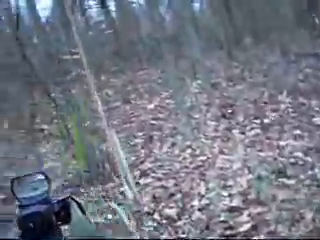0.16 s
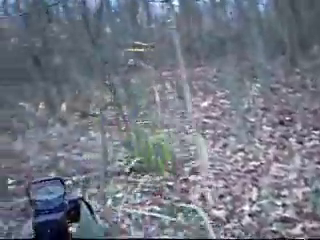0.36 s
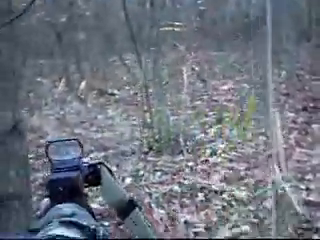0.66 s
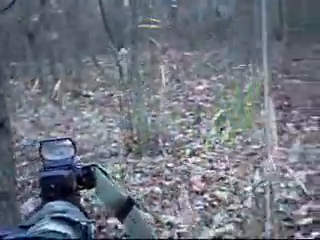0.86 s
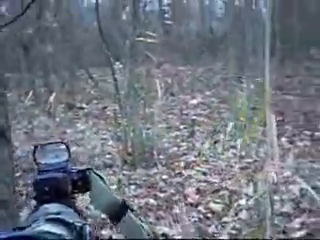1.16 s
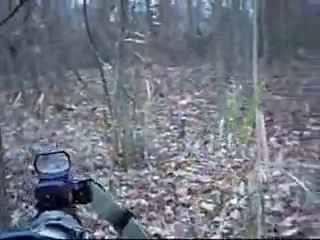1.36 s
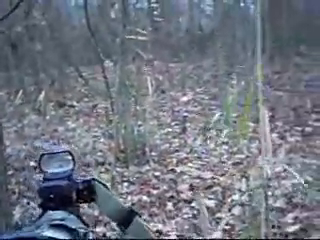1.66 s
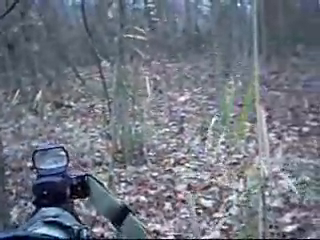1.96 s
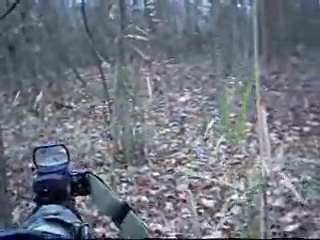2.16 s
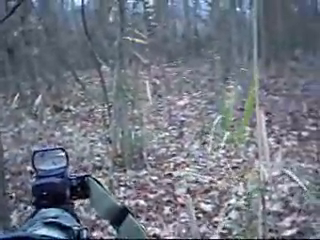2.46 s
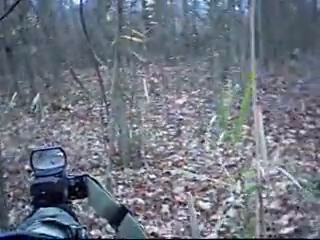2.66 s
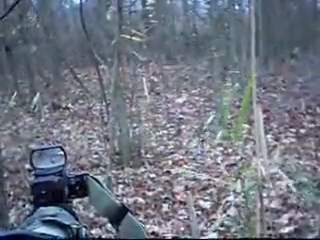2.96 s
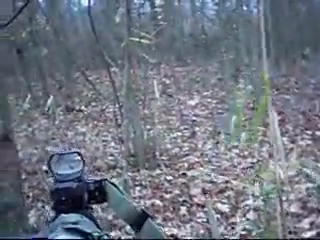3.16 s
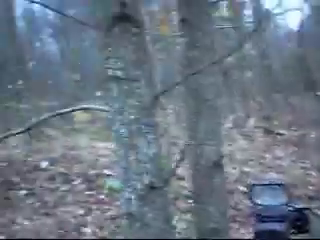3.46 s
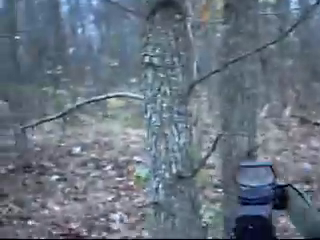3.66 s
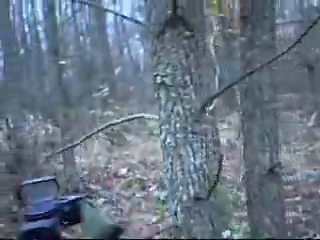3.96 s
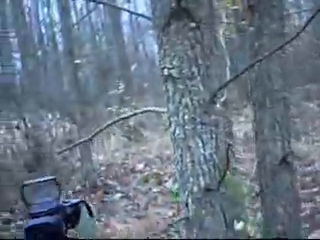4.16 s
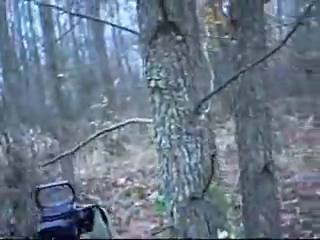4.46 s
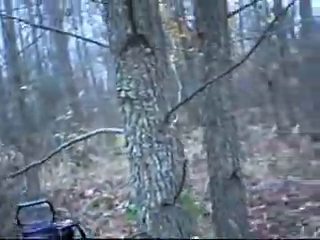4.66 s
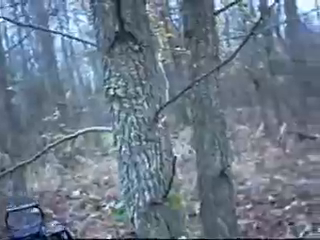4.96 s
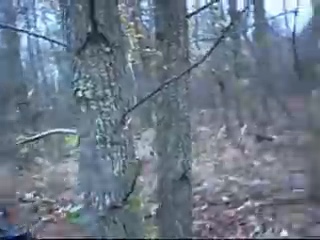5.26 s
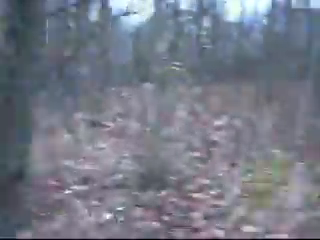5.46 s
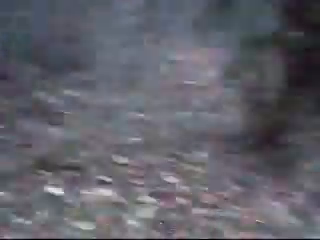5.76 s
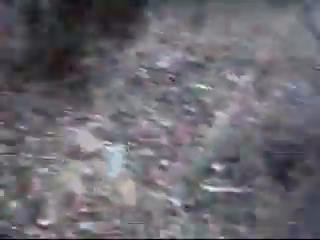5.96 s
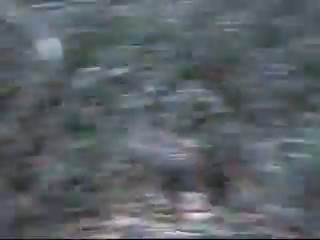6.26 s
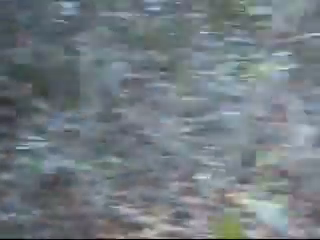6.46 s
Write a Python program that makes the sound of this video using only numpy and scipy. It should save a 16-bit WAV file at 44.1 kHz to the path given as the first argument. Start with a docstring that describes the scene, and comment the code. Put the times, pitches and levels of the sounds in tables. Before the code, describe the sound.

An electric airsoft rifle fires two rapid bursts up close, motor whining and piston clacking, with dry leaves rustling in the woods.

```python
"""Woods, on the microphone of a small handheld camera. First dry leaves rustle, with sharp dry ticks over
them, and the moving camera rumbles and bumps. At 0.8 s an electric airsoft rifle starts up right beside
it and fires a long burst, twelve shots a second: the geared motor whines and sags against the spring,
the piston clacks, the barrel pops, and the microphone overloads. A shorter burst follows at 4.1 s; in
both the level drops in steps. The motor coasts to rest, and the rustle and ticks grow to the end."""
import sys
import numpy as np
from scipy import signal
from scipy.fft import rfft, irfft
from scipy.io import wavfile

SR = 44100
rng = np.random.default_rng(int(sys.argv[2]) if len(sys.argv) > 2 else 0)


def unload_audio(sound):
    """Save the sound as a 16-bit wav file, at the path given as the first command line argument."""
    columns = np.transpose(np.atleast_2d(sound))
    # keep every value between -1 and 1, then stretch to whole-number steps
    steps = np.round(np.clip(columns, -1, 1) * 32767)
    wavfile.write(sys.argv[1], SR, steps.astype(np.int16))


N = 291051
TIME = np.arange(N) / SR

# Levels in the tables are relative.
# rustling leaves, one list each before, between and after the bursts: t/s, level/dB
LEAF_STIR = [
    [(0.0, -50), (0.332, -50.5), (0.76, -43.5)],
    [(3.3, -51.5), (3.452, -56), (3.718, -50.5), (3.97, -44), (4.11, -43)],
    [(5.53, -48.5), (6.094, -46), (6.242, -39.5), (6.368, -38.5), (6.6, -33.5)],
]
# spectrum of dry leaves: f/Hz, level/dB
LEAF_SPECTRUM = [(100, -10), (500, -5), (1200, -5), (2200, -6.5), (3200, -5), (4600, -3.5), (6200, -9),
                 (8000, -15), (10000, -22), (12400, -30)]
# camera moves that push air over the microphone: middle t/s, half length/s, level/dB
CAMERA_SWINGS = [(0.418, 0.28, -21.5), (0.851, 0.035, -17.5), (2.15, 1.2, -32), (4.743, 0.78, -30),
                 (5.969, .2, -19)]
# spectrum of that air: f/Hz, level/dB
RUMBLE_SPECTRUM = [(8, -11), (25, 2.5), (45, -3), (90, -7), (160, -18.5), (300, -29.5), (600, -45),
                   (1500, -73), (4000, -88)]
# soft bumps of the camera in the hand: t/s, signed height, rise/s
CAMERA_BUMPS = [(.12, 0.12, 0.0034), (0.308, -.27, 0.0029), (0.3607, -0.58, 0.0012), (.409, -0.16, 0.0011),
                (.455, -0.12, 0.0011), (.567, -0.094, .001), (.648, 0.16, 0.0019), (.688, 0.29, 0.0018),
                (.76, 0.25, 0.0022), (3.399, 0.056, .002), (3.557, 0.094, 0.0028), (3.715, 0.11, 0.0032),
                (3.834, 0.12, 0.0026), (3.996, 0.13, 0.0026), (4.118, 0.16, 0.0034), (5.652, .08, 0.0021),
                (6.318, 0.21, 0.0022), (6.552, 0.21, 0.0023)]
# something scuffs the camera: t/s, length/s, level/dB
CAMERA_SCUFFS = [(.3605, .005, -38), (6.3625, .0145, -16)]
# spectrum of a scuff: f/Hz, level/dB
SCUFF_SPECTRUM = [(100, 7.5), (500, 5), (1500, -1.5), (3000, -3.5), (5000, 4), (7500, -10.5), (12000, -22)]
# sharp dry ticks, growing louder to the end: t/s, level/dB
DRY_TICKS = [(0.4793, -20.5), (3.3677, -26), (3.6316, -33), (3.71, -34), (3.9419, -22.5), (5.6376, -23),
             (5.7174, -18), (5.7912, -17), (5.8651, -15.5), (6.0561, -13), (6.1444, -14.5), (6.2208, -15),
             (6.2756, -17), (6.2956, -12.5), (6.5041, -9), (6.5854, -6)]
# spectrum of a tick: f/Hz, level/dB
TICK_SPECTRUM = [(300, -1), (1500, -10.5), (3000, -1.5), (4600, 10.5), (6000, -1.5), (8000, -12.5),
                 (12000, -57)]
# bursts of fire: trigger t/s, first shot t/s, number of shots, period/s
FIRING = [(.778, .8812, 29, .08183), (4.125, 4.2176, 15, .08218)]
# recorded level of the shooting, which drops in abrupt steps after loud shots: t/s, level/dB
SHOOTING_LEVEL = [(.78, 13), (.893, 8.5), (0.895, -1), (3.29, -2), (4.125, 13), (4.23, 10), (4.75, 8),
                  (4.83, 4), (5.2, 4), (5.26, 1), (5.38, 0)]
# the spring's load through one cycle: share of the cycle, pinion mesh f/Hz, whine/dB, rattle/dB
SPRING_CYCLE = [(0, 2000, -2, 11), (.13, 2370, -11.5, 3), (.22, 2420, -8, -2), (.28, 2455, -6.5, 4.5),
                (.5, 2360, -2.5, 0), (.7, 2200, -3, 3), (.86, 1989, -3.5, 1), (.92, 1827, -14, -9.5),
                (1, 1998, -5.5, 9.5)]
# tones of the gear train: multiple of the pinion mesh, level/dB
GEAR_TONES = [(1 / 3, -24.5), (1, -19.5), (2, -21.5), (3, -36)]
# housing resonances that swell a gear tone sweeping over them: f/Hz, level/dB
HOUSING_RESPONSE = [(250, -53), (550, -15.5), (720, -4), (785, -3.5), (900, 4.5), (1250, -4), (1570, -1.5),
                    (1950, -7.5), (2200, -2), (2370, 2), (2600, -6.5), (3150, -4), (3900, -6.5),
                    (5000, -6.5)]
# spectrum of the gearbox shell: f/Hz, level/dB
SHELL_SPECTRUM = [(100, -28), (400, -9.5), (750, 0.5), (1150, -1.5), (1550, 2.5), (1950, -1), (2450, 3.5),
                  (3200, -1.5), (4200, 2), (4950, 2.5), (5300, 6), (5650, 3.5), (6300, 2.5), (7500, -14.5),
                  (10000, -23), (12500, -33)]
# small metal parts click in the gearbox: t/s, level/dB
LATCH_CLICKS = [(0.874, -6), (3.227, -10), (4.208, -4), (4.242, 9), (5.433, -13), (5.489, -12.5),
                (5.493, -11), (5.508, -20)]
# modes of those parts, of the last tooth letting go and of the first catching: f/Hz, level/dB, t60/s
LATCH_MODES = [(1210, -11, .019), (2160, -25, .055)]
SLIP_MODES = [(1746, 0, .012), (2170, 1, .0074)]
CATCH_MODES = [(1476, .016, .031)]
# modes of the piston's clack: f/Hz, level/dB, t60/s
PISTON_MODES = [(1420, -32, 0.0037), (2900, -6.5, 0.0042), (3936, -6.5, 0.0065), (4760, -4, 0.005),
                (6770, 7, 0.0023), (9900, -13, 0.0017), (12960, -36, 0.001)]
# the barrel's air column after the pop: f/Hz, level/dB, t60/s
BARREL_MODES = [(675, -8, 0.019), (786, 1.5, 0.011), (1058, -3.5, 0.023), (1164, -17, 0.027)]
# the stock, answering the blow in the opposite sense: f/Hz, level/dB, t60/s
STOCK_MODES = [(296, -17, 0.021)]
# shots whose pop falls together with the clack: t/s
NO_LAG_SHOTS = [3.111, 5.05]
# spectrum of the jolt to the camera: f/Hz, level/dB
RECOIL_SPECTRUM = [(30, -14), (95, -1), (190, -2.5), (300, -10.5), (600, -31), (2000, -57)]
# spectrum of the echo off the trunks: f/Hz, level/dB
ECHO_SPECTRUM = [(200, -21), (1000, 0), (5000, 5.5), (10000, -4.5)]

# where SHOOTING_LEVEL is higher, clack and jolt gain on the motor and the pop falls behind (dB per dB)
CLACK_SLOPE, RECOIL_SLOPE, POP_SLOPE = .63, 2.47, -.57


def amp(db):
    """Decibels to gain."""
    return 10 ** (np.asarray(db) / 20)


def unit(x):
    """Scales to an rms of one."""
    return x / np.sqrt(np.mean(x ** 2) + 1e-20)


def follow(rows, at):
    """Interpolates a table's other columns along its first."""
    first, *columns = np.transpose(rows)
    return [np.interp(at, first, c) for c in columns]


def add(mix, s, sound):
    """Mixes a sound in at time s."""
    part = mix[max(round(s * SR), 0):][:len(sound)]
    part += sound[:len(part)]


def colour(x, spectrum, size=8192):
    """Minimum-phase filter shaped like the spectrum; white noise keeps its level."""
    hz, db = np.transpose(spectrum)
    bin_hz = abs(np.fft.fftfreq(size, 1 / SR)) + 1
    log_gain = np.log(amp(np.interp(np.log(bin_hz), np.log(hz), db)))
    taps = np.fft.ifft(np.exp(np.conj(signal.hilbert(log_gain)))).real[:size // 2]
    return signal.oaconvolve(x, taps / np.linalg.norm(taps))[:len(x)]


def wander(rate_hz):
    """Smooth random drift of rms one, mostly slower than the given rate."""
    lowpass = np.exp(-(np.fft.rfftfreq(N, 1 / SR) / rate_hz) ** 2)
    return unit(irfft(rfft(rng.standard_normal(N)) * lowpass, N))


def ring(modes, t):
    """Dying modes; a machine strikes them almost alike every time."""
    hz, db, t60 = np.transpose(modes)[:, :, None]
    detune, strength = rng.standard_normal((2, len(modes), 1))
    hz, db = hz * (1 + .008 * detune), db + .7 * strength
    return (amp(db) * np.exp(-np.log(1000) * t / t60) * np.sin(2 * np.pi * hz * t)).sum(0)


def puff(t, decay_s):
    """A burst of noise that dies away."""
    return rng.standard_normal(len(t)) * np.exp(-t / decay_s)


def shot_times(burst, tiring_s_per_shot=.000032, slow_start_s=.0091):
    """The gearbox fires once a cycle, at an almost even pace."""
    _, first, count, period = burst
    k = np.arange(count)
    tiring = tiring_s_per_shot * k ** 2 / 2  # the tiring battery lengthens each cycle
    slow_start = slow_start_s * (1 - .15 ** k)  # the motor is still gathering speed
    return first + k * period + tiring + slow_start


def all_shots():
    """Every shot as t/s, shooting level/dB."""
    times = np.concatenate([shot_times(burst) for burst in FIRING])
    return zip(times, follow(SHOOTING_LEVEL, times)[0])


def leaves(level_db=3.5, hiss_db=-1, crackle_db=-5, cracks_per_s=450):
    """Dry leaves rustle: a soft hiss thick with tiny cracks of uneven size."""
    stir_db, = follow(np.concatenate(LEAF_STIR), TIME)
    cracks = (rng.random(N) < cracks_per_s / SR) * rng.standard_normal(N)
    cracks *= amp(4 * np.minimum(rng.exponential(1, N), 4))
    hiss = rng.standard_normal(N) * amp(wander(34))
    rustle = amp(hiss_db) * unit(hiss) + amp(crackle_db) * unit(cracks)
    return amp(level_db + stir_db) * unit(colour(rustle, LEAF_SPECTRUM))


def air_rumble(still_db=-40):
    """Air rumbles on the microphone and swells as the camera moves."""
    swells = sum(amp(db) * np.exp(-abs((TIME - s) / half) ** 3) for s, half, db in CAMERA_SWINGS)
    return (amp(still_db) + swells) * unit(colour(rng.standard_normal(N), RUMBLE_SPECTRUM))


def bumps():
    """Handling reaches the microphone as soft, one-sided pressure pulses."""
    out = np.zeros(N)
    for s, height, rise_s in CAMERA_BUMPS:
        age = TIME[:2500] / rise_s
        add(out, s, height * (age * np.exp(1 - age)) ** 2)
    return out


def scuffs():
    """Brief gritty rubs on the camera's body."""
    contact = sum(amp(db) * (TIME > s) * (TIME < s + length) for s, length, db in CAMERA_SCUFFS)
    grit = unit(rng.standard_normal(N) * amp(2 * wander(700)))
    return colour(contact * grit, SCUFF_SPECTRUM)


def ticks(trim_db=-5, spray_db=-19):
    """Sharp dry ticks over the rustle: each a very short crack with a faint spray after it."""
    out, t = np.zeros(N), TIME[:1500]
    for s, db in DRY_TICKS:
        crack = colour(puff(t, decay_s=.0002) + amp(spray_db) * puff(t, decay_s=.0053), TICK_SPECTRUM)
        add(out, s + .00033, 2 * amp(db + trim_db) * crack / abs(crack).max())
    return out


def gear_whine(mesh_hz, mesh_phase):
    """Meshing teeth sing in fluttering tones that swell on the housing's resonances."""
    flutter_db = 2.2 * wander(130)
    whine = np.zeros(N)
    for multiple, db in GEAR_TONES:
        housing_db, = follow(HOUSING_RESPONSE, multiple * mesh_hz)
        whine += amp(db + flutter_db + housing_db) * np.sin(multiple * mesh_phase)
    return np.sqrt(2) * whine


def gear_rattle(mesh_phase, pinion_teeth=10, knocks_per_s=900, scrape_db=-25, knock_db=-29, shaft_db=-26):
    """Inside the shell each tooth scrapes into mesh, and loose ones knock at random."""
    # uneven teeth and brushes repeat with every turn of the shaft
    orders = range(3, 3 * pinion_teeth)
    shaft = unit(sum(np.cos(k * mesh_phase / pinion_teeth + 2 * np.pi * rng.random()) for k in orders))
    scrape = unit(rng.standard_normal(N) * (1 + .45 * np.cos(mesh_phase)))
    knocks = unit((rng.random(N) < knocks_per_s / SR) * rng.uniform(-1, 1, N))
    rattle = amp(scrape_db) * scrape + amp(knock_db) * knocks + amp(shaft_db) * shaft / 2
    return colour(rattle, SHELL_SPECTRUM)


def motor(burst, spin_up_s=.058, coast_s=.092642):
    """The geared motor spins up, sags each time it draws the spring back, and coasts to rest."""
    start, times = burst[0], shot_times(burst)
    stop = times[-1] + coast_s
    cycle_edges = [start, *times, stop]
    cycle_share = np.interp(TIME, cycle_edges, np.arange(len(cycle_edges))) % 1
    loaded_hz, whine_db, rattle_db = follow(SPRING_CYCLE, cycle_share)
    run_up = 1 - np.exp(-np.maximum(TIME - start, 0) / spin_up_s)
    speed = run_up * np.clip((stop - TIME) / coast_s, 0, 1)
    mesh_hz = loaded_hz * speed * (1 + .0065 * wander(300) + .009 * wander(9))
    mesh_phase = 2 * np.pi * np.cumsum(mesh_hz) / SR
    strain_db = 5 * (1 - run_up)  # the whine stands out until the motor is up to speed
    whine = amp(whine_db + strain_db) * gear_whine(mesh_hz, mesh_phase)
    return speed ** 1.15 * (whine + amp(rattle_db) * gear_rattle(mesh_phase))


def latch():
    """Small metal parts click and ring in the gearbox near the ends of each burst."""
    out, t = np.zeros(N), TIME[:1500]
    for s, db in LATCH_CLICKS:
        click = .69 * colour(puff(t, decay_s=.0011), SHELL_SPECTRUM)
        add(out, s, amp(db) * (click + ring(LATCH_MODES, t)))
    return out


def piston_clack(t, crack_db=-7, push_db=-8):
    """The piston slams home: a bright ring, a crack and a one-sided push of pressure."""
    clack = ring(PISTON_MODES, t) + amp(crack_db) * puff(t, decay_s=.0012)
    attack = 1 - np.exp(-t / .00016)
    push = amp(push_db) * np.exp(-t / .00039)
    return 2 * (clack * attack + push)


def barrel_pop(t, level_db=4.5):
    """The piston's air rings the barrel, and the stock answers in the opposite sense."""
    attack = 1 - np.exp(-t / .0013)
    return amp(level_db) * (ring(BARREL_MODES, t) - ring(STOCK_MODES, t)) * attack


def air_blast(t, shake_db=-15, hiss_db=-33):
    """The same blow shakes the shell while the air hisses out."""
    shake = colour(puff(t, decay_s=.0055), SHELL_SPECTRUM)
    return amp(shake_db) * shake + amp(hiss_db) * puff(t, decay_s=.025)


def shots(pop_lag_s=.0039, lag_spread_s=.00032, slip_db=-12, catch_db=-20):
    """The last tooth lets go, the piston clacks, the barrel pops, and the first tooth catches again."""
    out, t = np.zeros(N), TIME[:4000]
    for s, shooting_db in all_shots():
        clack_luck, pop_luck, lag_luck = rng.standard_normal(3)
        clack_gain = amp(CLACK_SLOPE * shooting_db + 1.9 * clack_luck)
        pop_gain = amp(POP_SLOPE * shooting_db + .5 * pop_luck)
        together = np.isclose(s, NO_LAG_SHOTS, atol=.01).any()
        lag_s = 0 if together else pop_lag_s + lag_spread_s * lag_luck
        add(out, s - .0004, clack_gain * piston_clack(t))
        add(out, s + lag_s, pop_gain * barrel_pop(t) + clack_gain * air_blast(t))
        add(out, s - .0095, amp(slip_db) * ring(SLIP_MODES, t))
        catch_s = s + rng.normal(.017, .0012)
        catch = ring(CATCH_MODES, t) + colour(puff(t, decay_s=.0023), SHELL_SPECTRUM)
        add(out, catch_s, amp(catch_db) * catch)
    return out


def recoil(thud_db=-28):
    """At this close range each shot jolts the camera with a dull, ragged thud."""
    out, t = np.zeros(N), TIME[:3000]
    for s, shooting_db in all_shots():
        thud = colour(puff(t, decay_s=.0044), RECOIL_SPECTRUM)
        add(out, s, amp(thud_db + RECOIL_SLOPE * shooting_db) * thud / abs(thud).max())
    return out


def woods(direct, wet_db=-23, t60_s=.27, echoes_per_s=2000):
    """The direct sound, with a thin, short echo scattered by the trunks around."""
    t = TIME[:SR // 2]
    taps = rng.standard_normal(len(t)) * (rng.random(len(t)) < echoes_per_s / SR)
    taps *= np.exp(-np.log(1000) * t / t60_s) * (t > .008)
    echo = signal.fftconvolve(direct, taps / np.linalg.norm(taps))[:N]
    return direct + amp(wet_db) * colour(echo, ECHO_SPECTRUM)


def scene():
    """One microphone in the woods: the rifle beside it, ticks, leaves and the camera's own noises."""
    shooting_db, = follow(SHOOTING_LEVEL, TIME)
    rifle = amp(shooting_db) * (sum(motor(burst) for burst in FIRING) + shots())
    outdoors = woods(rifle + latch() + ticks()) + leaves()
    camera = air_rumble() + bumps() + scuffs() + recoil()
    return (outdoors + camera)[None]


def record(dry, cutoff_hz=12468):
    """The microphone overloads and clips the loud peaks flat; then the top treble is cut off."""
    lowpass = signal.firwin(255, cutoff_hz, window=("kaiser", 7), fs=SR)
    return signal.oaconvolve(np.clip(dry, -1, 1), lowpass[None], "same")


dry = scene()
out = record(dry)
unload_audio(out)
```